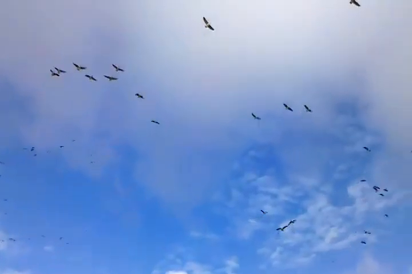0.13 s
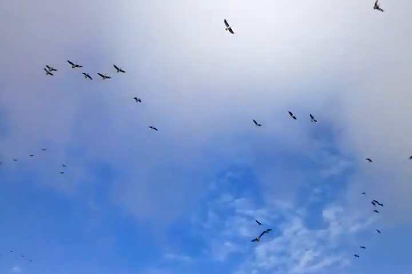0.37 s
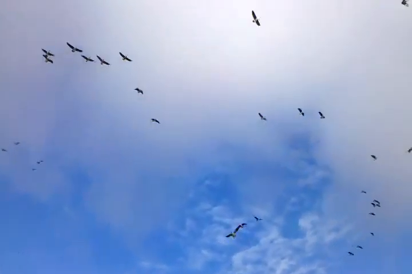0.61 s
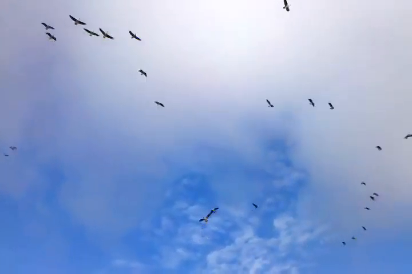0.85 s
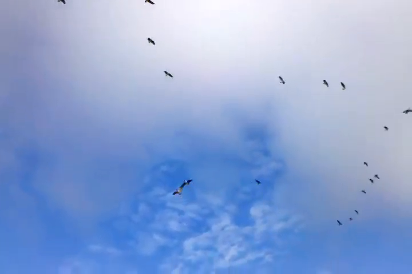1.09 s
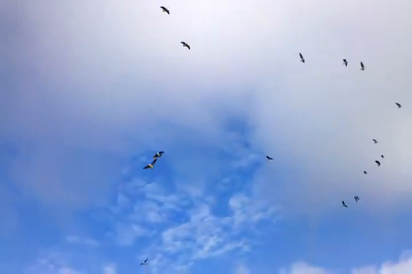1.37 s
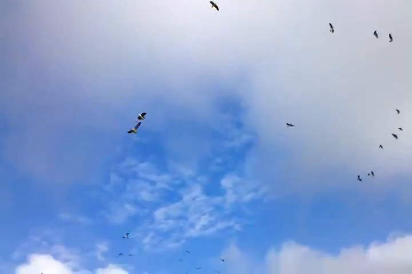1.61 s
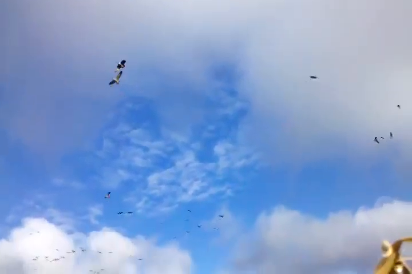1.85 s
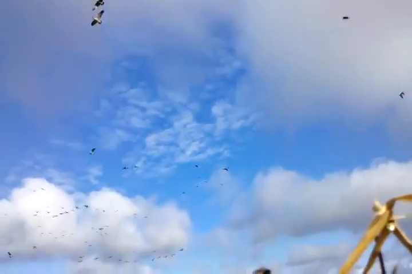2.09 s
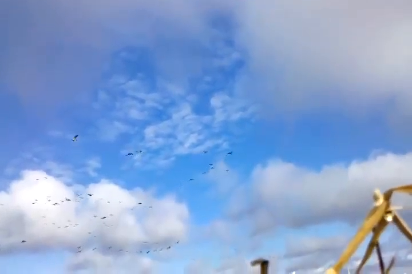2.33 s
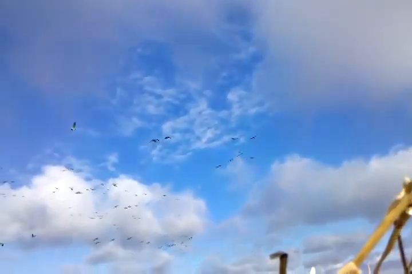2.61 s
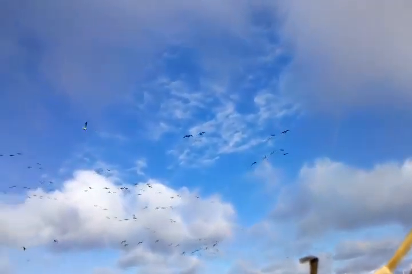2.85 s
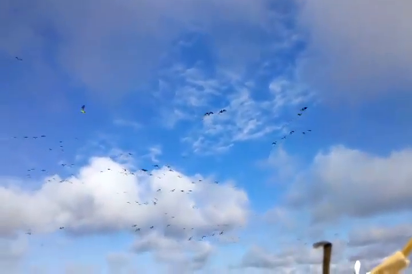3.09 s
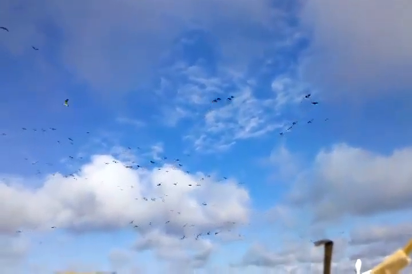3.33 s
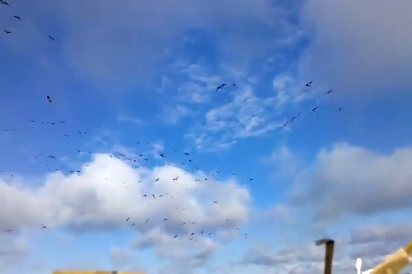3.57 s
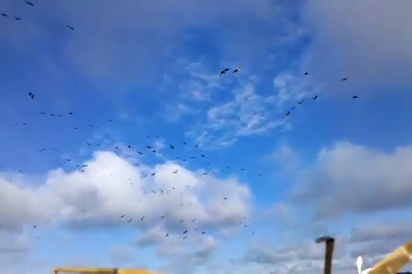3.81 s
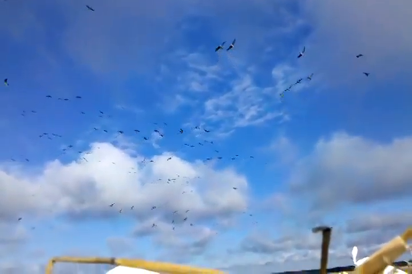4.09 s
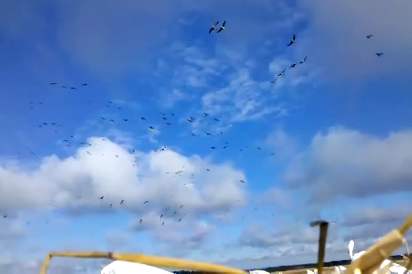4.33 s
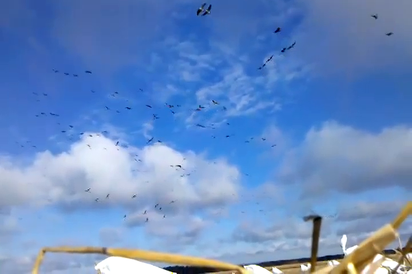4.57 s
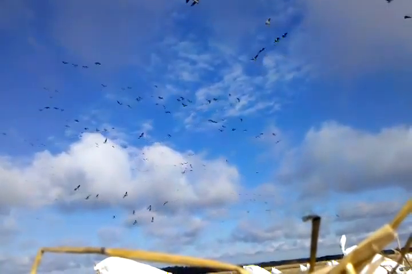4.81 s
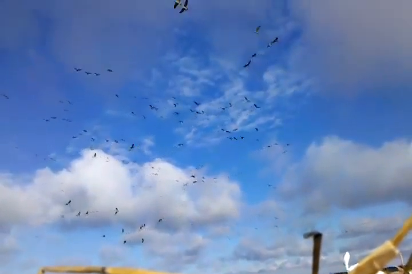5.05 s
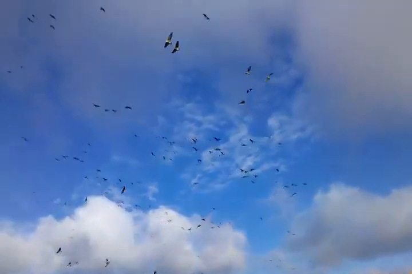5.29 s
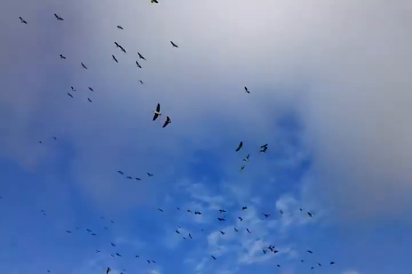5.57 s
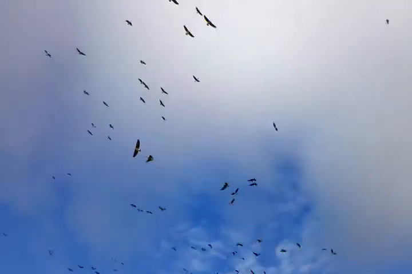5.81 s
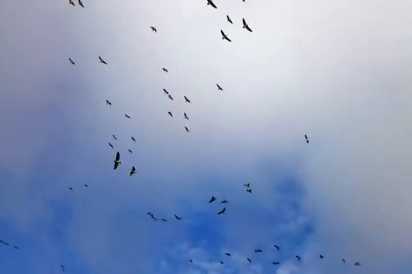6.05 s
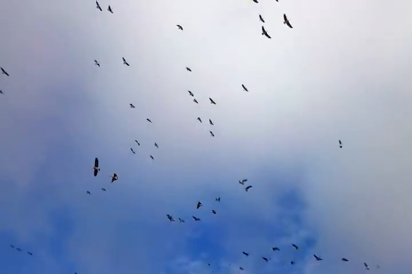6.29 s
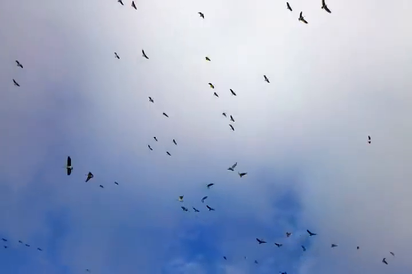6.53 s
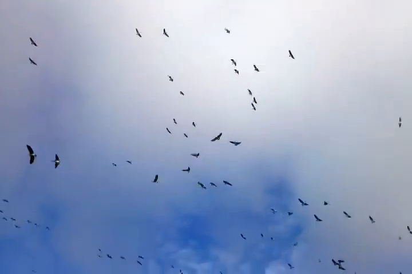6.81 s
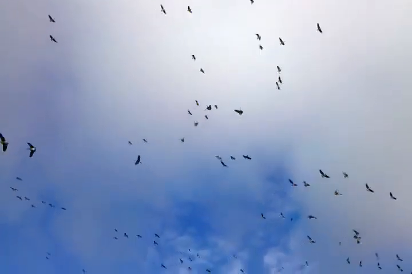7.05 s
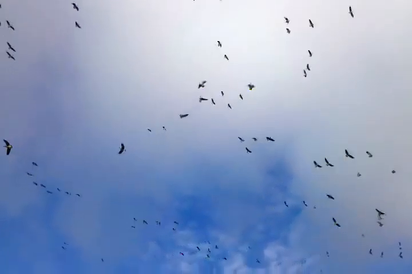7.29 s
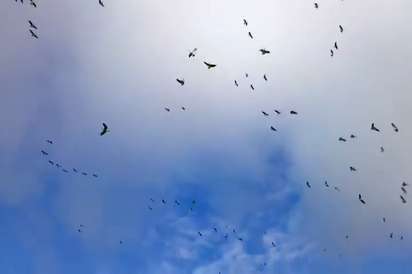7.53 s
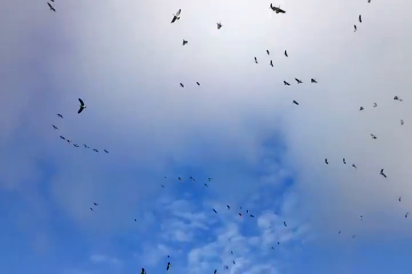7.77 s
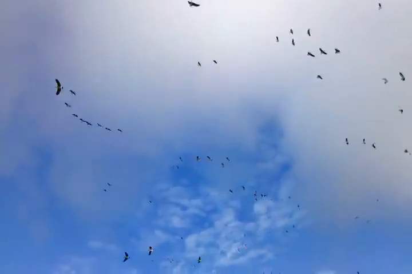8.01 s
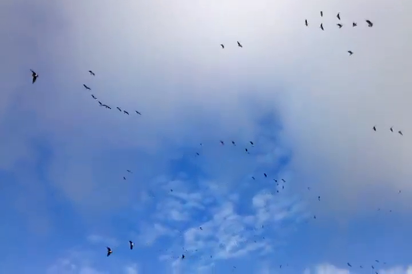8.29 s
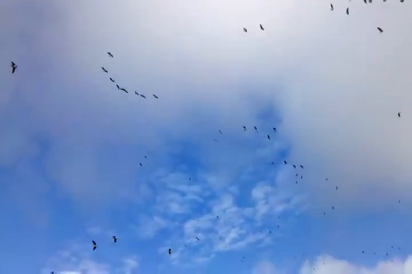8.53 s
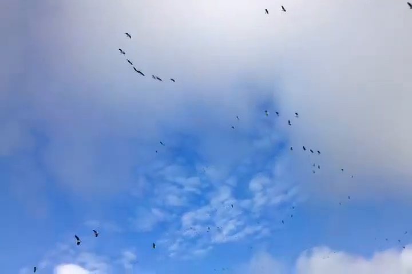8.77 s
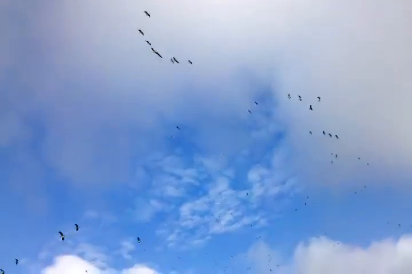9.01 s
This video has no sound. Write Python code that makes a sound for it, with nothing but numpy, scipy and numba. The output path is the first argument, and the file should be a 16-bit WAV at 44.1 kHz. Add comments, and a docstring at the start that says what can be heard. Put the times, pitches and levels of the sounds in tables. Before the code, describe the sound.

A huge flock of geese flies over an open stubble field, calling without pause. Far calls blur into a busy chorus while nearer birds yelp sharply. Four long, deep honks stand out in the first two seconds, hoarse squawks rasp between them, and dry stalks tick close by, most strongly just before three seconds. Light wind thuds softly on a small microphone with thin bass and dulled top treble.

```python
"""A stubble field on a breezy day: a large flock of geese passes over, heard by a small microphone.
Geese: harmonic stacks on an arched, unsteady pitch; near ones have upper partials that follow the bill.
A thousand short far calls, with coloured noise, blur into a chorus; hoarse squawks are noise bursts.
Dry stalks tick close by as very short rings; gusts thud softly on the microphone as low noise."""
import sys
import numpy as np
from scipy import signal
from scipy.fft import rfft, irfft, next_fast_len
from scipy.io import wavfile
from scipy.ndimage import uniform_filter1d
from numba import njit

SR = 44100
rng = np.random.default_rng(int(sys.argv[2]) if len(sys.argv) > 2 else 0)


def ratio(d):
    """dB to gain"""
    e = np.asarray(d, float) / 20
    return 10 ** e


def wav_out(sig):
    """Save sig, one row per channel (or a flat mono array), as 16-bit PCM at SR to the path in sys.argv[1]."""
    wavfile.write(sys.argv[1], SR, np.round(np.clip(np.atleast_2d(sig).T, -1, 1) * 32767).astype(np.int16))


N = 403074
TIME_S = np.arange(N) / SR
SPLIT_HZ, BILL_HZ = 2200, 3600  # bounds of the low, middle and high partials


def shape_db(table, hz):
    """A spectrum table read on a log-frequency axis."""
    table_hz, db = np.transpose(table)
    return np.interp(np.log(np.maximum(hz, 1)), np.log(table_hz), db)


def noise(table, size=N):
    """Noise of rms 1 with the colour of a spectrum table."""
    n = next_fast_len(size)
    colour = ratio(shape_db(table, np.fft.rfftfreq(n, 1 / SR)))
    x = irfft(rfft(rng.standard_normal(n)) * colour, n)[:size]
    return x / x.std()


def walk(rate_hz, size=N):
    """Random levels held 1 / rate_hz and slewed twice; spread near 1."""
    k = int(SR / rate_hz)
    held = np.repeat(rng.standard_normal(size // k + 1), k)
    return 1.478 * uniform_filter1d(uniform_filter1d(held, k), k)[:size]


def follow(table_s, table_db):
    """Level in dB over the scene, straight lines between the points."""
    return np.interp(TIME_S, table_s, table_db)


def add(out, start_s, x):
    """Mixes x in from start_s on."""
    i = int(round(start_s * SR))
    a, b = max(i, 0), max(min(i + len(x), N), 0)
    out[a:b] += x[a - i:max(b, a) - i]


@njit
def stack(phase, gain):
    """Sum of the harmonics of a running phase, each with its complex gain."""
    out = np.zeros(len(phase))
    for i in range(len(phase)):
        z = np.exp(1j * phase[i])
        power = z
        for g in gain:
            out[i] += (g * power).imag
            power *= z
    return out


def membrane(hz, colour, jitter, scatter_db):
    """Phase of an unsteady membrane, hoarse at first; gains and mean frequencies of its harmonics."""
    hoarse_start, settle_s = 0.035, 0.006
    jitter = jitter + hoarse_start * np.exp(-np.arange(len(hz)) / SR / settle_s)
    phase = 2 * np.pi * np.cumsum(hz * (1 + jitter * walk(400, len(hz)))) / SR
    k = np.arange(1, 13)
    at_hz = k * hz.mean()
    gain = ratio(shape_db(colour, at_hz) + scatter_db * rng.standard_normal(len(k)))
    return phase, gain * np.exp(.3j * k ** 2), at_hz


def call(length_s, hz, rise_percent, sag_per_s=21.1, edge_s=0.016, ends_db=3):
    """One call: time, place in it (0-1), pitch arching more in longer calls, level with soft ends."""
    attack_s = 0.008  # the fades are half way at 0 and length_s
    fall_per_s, scoop_per_s = 29, 9  # % of pitch per s of length, like sag_per_s
    t = np.arange(-attack_s, length_s + edge_s, 1 / SR)
    at = t / length_s
    bend = (2 * at - 1) ** 2
    edges = np.minimum((t - t[0]) / attack_s, (t[-1] - t) / edge_s)
    fade = np.sin(np.pi / 2 * np.clip(edges / 2, 0, 1)) ** 2
    # the pitch drops further as the breath runs out
    lowering = sag_per_s * bend + fall_per_s * at ** 8 + scoop_per_s * (1 - at) ** 8
    percent = rise_percent * (at - .5) - length_s * lowering
    return t, at, hz * (1 + percent / 100), fade * ratio(ends_db * bend)


# windpipe and bill: partial_hz, level_db
THROAT = [(600, -0.5), (1300, 21.5), (1900, 2), (2600, 6.5), (3400, -7), (4300, 2.5), (5500, 1.5),
          (6600, 1.5), (7300, -9), (8300, -11)]
# fundamental against second partial: pitch_hz, level_db
FUNDAMENTAL = [(600, -15), (645, -10.5), (700, -28), (780, -5), (850, -3.5), (890, -7.5), (1050, -12)]


def voice(hz, fade, bill, low_db, middle_db, high_db):
    """A throat in three groups of partials; the upper two follow the opening of the bill."""
    phase, gain, at_hz = membrane(hz, THROAT, 0.0022, 1.5)
    gain[0] = abs(gain[1]) * ratio(shape_db(FUNDAMENTAL, hz.mean()))
    gain[2] *= min(1, abs(gain[1] / gain[2]) / 2)  # the third stays under the second
    group = np.digitize(at_hz, (SPLIT_HZ, BILL_HZ))
    for k, db in enumerate((low_db, middle_db, high_db)):
        inside = group == k
        gain[inside] *= ratio(db) / np.sqrt(np.sum(abs(gain[inside]) ** 2) / 2)
    low, middle, high = (stack(phase, gain * (group == k)) for k in range(3))
    flutter = ratio(0.9 * walk(124.3, len(hz)))
    return fade * flutter * (low + np.sqrt(bill) * middle + bill * high)


# wind on the microphone: time_s, level_db
GUSTS = [(0.0, -59.5), (1.35, -60), (1.93, -54.5), (2.04, -45.5), (2.09, -60.5), (2.95, -64.5),
         (3.05, -56.5), (3.44, -64), (4.45, -61), (5.06, -43.5), (5.17, -60.5), (5.37, -38.5),
         (5.47, -61.5), (5.6, -41), (5.8, -53), (7.07, -63), (7.23, -54.5), (7.38, -63.5), (7.64, -51.5),
         (8.02, -61), (9.11, -49), (9.14, -54)]
# gust colour: freq_hz, level_db
GUST_COLOUR = [(30, -11.5), (100, -0.5), (160, -2.5), (230, -4), (350, -13.5), (600, -11.5), (1000, -79.5)]
# low murmur: time_s, level_db
MURMUR = [(0, -55.5), (0.9, -54), (1.1, -59.5), (2.9, -57), (3.1, -54), (3.8, -60), (4.8, -64), (4.95, -64),
          (5.7, -63), (5.8, -63.5), (8.0, -66.5), (8.1, -56), (9.14, -61)]
# murmur colour: freq_hz, level_db
MURMUR_COLOUR = [(100, -40), (200, 2), (330, -7), (480, -3.5), (700, -35)]


def wind():
    """Low turbulence that buffets faster than the gusts change, over a low murmur of varying level."""
    gusts = ratio(follow(*np.transpose(GUSTS)) + 2.2 * walk(20)) * noise(GUST_COLOUR)
    murmur = ratio(follow(*np.transpose(MURMUR))) * noise(MURMUR_COLOUR)
    return gusts + murmur


# far flock, below and above SPLIT_HZ: time_s, low_db, high_db
FLOCK = [(0.0, -36, -38), (0.3, -34.5, -45.5), (0.71, -35, -40), (0.95, -36.5, -45), (1.15, -39.5, -45),
         (1.4, -35, -44.5), (1.95, -39, -43.5), (2.3, -34, -43.5), (2.58, -37, -45), (3.05, -33.5, -41.5),
         (3.42, -39, -55.5), (3.9, -37, -49.5), (5.2, -36.5, -48), (5.75, -39, -51), (6.2, -35.5, -47),
         (6.8, -37, -47), (7.1, -37.5, -51.5), (7.59, -36.5, -44), (8.3, -36.5, -44.5), (9.14, -38, -42.5)]
# far call colour: freq_hz, level_db
FAR_COLOUR = [(300, -34), (450, -17), (600, -9.5), (860, -11), (1050, -7), (1290, -3.5), (1760, -6.5),
              (2250, -19), (3200, -14), (4400, -4), (6500, -6.5), (7400, -20.5)]
# merged upper partials of the furthest birds: freq_hz, level_db
WASH_COLOUR = [(2000, -39.5), (2400, -3), (3300, -4), (4500, -2), (6500, -0.5), (7500, -6)]


def far_geese(count=1000):
    """Far birds call at their own pitch, slur and distance; the furthest merge into a noise wash."""
    lowest_hz, highest_hz, fundamental_db, wash_db = 590, 1015.4, -5.5, -13
    out = np.zeros(N)
    for when, pitch, slur, far, long, facing in rng.random((count, 6)):
        own_hz = lowest_hz + (highest_hz - lowest_hz) * pitch
        rise_percent = 17.76 * (slur - .3)
        _, _, hz, fade = call(.03 + .07 * long, own_hz, rise_percent, sag_per_s=44.6, edge_s=.012)
        phase, gain, at_hz = membrane(hz, FAR_COLOUR, .002, 3.0)
        gain[0] *= ratio(fundamental_db)
        gain[at_hz > SPLIT_HZ] *= ratio(6 * facing ** 3)  # the treble beams ahead of the bill
        add(out, when * N / SR - .05, fade * ratio(-9 * far) * stack(phase, gain))
    # ground and air scatter each honk into a short tail
    tail_n = SR // 4
    tail = rng.standard_normal(tail_n) * np.exp(-np.arange(tail_n) / SR / .05)
    out = out / out.std()
    out = out + ratio(-33) * signal.fftconvolve(out, tail)[:N]
    blur = ratio(-10 + walk(9)) * noise(FAR_COLOUR)
    out = out / out.std() + blur + ratio(wash_db) * noise(WASH_COLOUR)
    # shifting air takes away more or less of the treble
    low, high = (signal.sosfilt(signal.butter(4, SPLIT_HZ, kind, fs=SR, output="sos"), out)
                 for kind in ("low", "high"))
    time_s, low_db, high_db = np.transpose(FLOCK)
    low_gain = ratio(follow(time_s, low_db))
    high_gain = ratio(follow(time_s, high_db) + 0.4 * walk(8.3))
    return low_gain * low / low.std() + high_gain * high / high.std()


# near yelps: start_s, length_s, pitch_hz, rise_percent (start to end),
# low_db (partials to SPLIT_HZ), middle_db (to BILL_HZ), high_db (above)
YELPS = [(0.008,0.08,985,4.5,-38,-46.5,-36.5), (0.258,0.03,820,-3.5,-67,-56,-39),
         (0.362,0.047,906,0,-35.5,-45,-32.5), (0.415,0.04,932,-2,-34,-44,-29),
         (0.516,0.074,819,-0.5,-33.5,-50,-30), (0.631,0.11,987,0,-35,-51,-40),
         (0.953,0.08,975,0,-46,-64,-57), (1.065,0.068,872,5,-43.5,-57,-53),
         (1.139,0.055,964,-0.5,-41,-52,-47), (1.205,0.025,785,7,-36,-51,-35.5),
         (1.672,0.095,950,1.9,-41.5,-39.5,-38), (1.807,0.09,830,-2,-45,-64,-40.5),
         (2.302,0.105,967,3.5,-39,-48,-40.5), (2.478,0.069,938,0,-51,-40.5,-40.5),
         (2.906,0.105,945,-2.5,-35.5,-49,-33.5), (3.093,0.1,850,-1,-31,-38,-34.5),
         (3.211,0.077,940,0.5,-59,-44.5,-40), (3.327,0.035,699,-0.5,-31.5,-44,-43.5),
         (3.387,0.026,880,-3,-50,-58,-55), (3.482,0.044,645,6,-49,-57,-48), (3.632,0.044,680,3,-46,-58,-53),
         (3.706,0.12,892,4,-44.5,-57,-45), (3.851,0.077,1064,0,-48.5,-60,-50.5),
         (3.943,0.11,896,0.5,-50,-53.5,-46.5), (4.135,0.11,707,6.5,-41.5,-61,-55),
         (4.205,0.1,947,1,-47,-52.5,-54.5), (4.353,0.035,642,10,-38.5,-52,-46),
         (4.427,0.053,877,-1,-41,-49,-45), (4.513,0.11,874,-1,-45.5,-56,-68),
         (4.612,0.055,876,1,-48,-54,-46), (4.76,0.072,604,7,-40,-49,-47), (5.002,0.051,719,1.5,-40,-56,-46),
         (5.045,0.095,905,4.5,-47,-54,-41), (5.04,0.07,683,9.5,-49,-54,-54),
         (5.209,0.074,816,1,-49,-53,-42.5), (5.241,0.045,702,2,-49,-51,-41.5),
         (5.305,0.05,851,-2,-47,-51,-48), (5.462,0.052,898,3,-42.5,-48.5,-43.5),
         (5.583,0.096,703,10,-46,-53,-47), (5.727,0.032,1060,-1,-45,-52,-40),
         (5.816,0.1,884,0,-45.5,-50.5,-52), (5.921,0.075,723,3,-42,-54,-47.5),
         (6.025,0.046,923,2,-43,-54,-46.5), (6.135,0.08,907,-4,-42,-48,-41.5),
         (6.223,0.13,902,-1,-41.5,-51.5,-45), (6.4,0.074,834,1.5,-50,-53,-47.5),
         (6.43,0.057,932,2.5,-47,-54,-45.5), (6.533,0.057,690,-2.5,-36,-57,-59),
         (6.698,0.068,835,-3.5,-38.5,-44,-38.5), (6.958,0.048,927,-2.5,-42,-55,-39.5),
         (6.973,0.069,696,2,-47,-52,-44.5), (7.171,0.085,890,1.5,-49,-53,-41),
         (7.272,0.058,756,6,-39.5,-61,-59.5), (7.368,0.075,909,1.5,-41,-48.5,-38.5),
         (7.535,0.036,847,2,-44,-51,-44.5), (7.8,0.046,698,-1,-37.5,-57,-37.5),
         (7.896,0.052,877,3.5,-49,-48,-48), (7.935,0.11,704,5,-47,-57,-44),
         (8.025,0.051,1011,0.5,-42.5,-45.5,-41.5), (8.11,0.06,906,2,-68,-64,-37),
         (8.229,0.084,888,5,-39,-47.5,-46), (8.35,0.053,901,4.5,-39,-45,-35.5),
         (8.535,0.062,892,3,-40,-47,-39), (8.733,0.024,830,-5,-62,-55,-28),
         (8.784,0.035,781,5.5,-38,-64,-45.5), (8.838,0.023,681,3.5,-40,-49,-38),
         (8.878,0.06,670,3,-40,-53,-47), (9.061,0.054,1048,-1.2,-50,-48,-42)]


def near_yelps():
    """Short calls; upper partials swell on their own as the bill opens and turns to the listener."""
    bill_at, bill_width = 0.46, 0.47  # shares of the call
    out = np.zeros(N)
    for start_s, length_s, pitch_hz, rise_percent, *levels_db in YELPS:
        t, at, hz, fade = call(length_s, pitch_hz, rise_percent)
        bill = np.exp(-.5 * ((at - bill_at) / bill_width) ** 2)
        add(out, start_s + t[0], voice(hz, fade, bill, *levels_db))
    return out


# dry stalks: start_s, level_db (before the envelope), ring_hz
TICKS = [(0.283, -27, 5160), (0.581, -23, 6500), (0.635, -21, 6400), (0.9888, -25, 5930),
         (1.092, -27, 6700), (1.186, -21, 6020), (1.375, -15.5, 6660), (2.7148, -17.5, 5800),
         (2.72, -12, 7100), (2.7515, -6, 6370), (2.7668, -14.5, 6860), (2.789, -12, 5800),
         (3.269, -28, 6950), (3.31, -26.5, 6900), (3.467, -22.5, 5950), (3.609, -31, 6500),
         (3.715, -30, 6300), (4.077, -22, 7060), (4.3, -28, 6450), (4.318, -28.5, 6150), (8.347, -12, 6300),
         (8.625, -13.5, 7000)]
# snap of a stalk: freq_hz, level_db
CRACK_COLOUR = [(500, -12.5), (1500, 0.5), (4000, 2), (8000, 2.5)]


def stalks(count=45):
    """Each tick is a very short high ring with a crack; fainter ones come all the time."""
    attack_s, decay_s = 0.0002, 0.00042
    out, t = np.zeros(N), np.arange(SR // 100) / SR
    envelope = (1 - np.exp(-t / attack_s)) ** 2 * 2 * np.exp(-t / decay_s)
    faint = [(when * N / SR, -37 + 10 * size, 5400 + 1500 * pitch)
             for when, size, pitch in rng.random((count, 3))]
    for start_s, level_db, ring_hz in TICKS + faint:
        tick = np.sin(2 * np.pi * ring_hz * t) + 0.55 * noise(CRACK_COLOUR, len(t))
        add(out, start_s, ratio(level_db) * tick * envelope)
    return out


# hoarse squawks: centre_s, level_db, half_length_s
RASPS = [(0.339, -35, 0.03), (0.402, -30, 0.025), (0.63, -37, 0.025), (0.886, -34, 0.03),
         (1.235, -41, 0.025), (1.406, -37, 0.03), (2.05, -38, 0.025), (2.115, -38, 0.03),
         (2.292, -33, 0.03), (2.897, -33, 0.025), (3.09, -34, 0.03), (3.335, -41, 0.02),
         (3.375, -40, 0.025), (5.727, -44, 0.012), (6.36, -42, 0.02), (4.432, -40, 0.04),
         (4.812, -41, 0.04), (4.884, -37, 0.018), (4.922, -39, 0.02), (6.9, -42, 0.04), (7.53, -41, 0.04),
         (7.79, -39, 0.04), (8.715, -34, 0.035)]
# squawk colour: freq_hz, level_db
RASP_COLOUR = [(500, -23.5), (1500, -6), (3000, -9), (4200, 6), (8000, -5.5)]


def rasps():
    """Air forced through a membrane that flaps without pitch: bright noise of rough level."""
    out = np.zeros(N)
    for centre_s, level_db, half_length_s in RASPS:
        n = int(2 * max(half_length_s, .01) * SR)
        rough = ratio(level_db + 2 * walk(500, n))
        add(out, centre_s - half_length_s, rough * np.hanning(n) * noise(RASP_COLOUR, n))
    return out


# long deep honks: start_s, length_s, pitch_hz, rise_percent (start to end),
# low_db, middle_db, high_db (groups as in the yelps), widest_s (bill, after the start)
HONKS = [(0.375, 0.17, 644, 10.3, -29, -47, -25, 0.099), (0.721, 0.16, 590, 14, -32, -35.5, -34, 0.075),
         (1.23, 0.18, 646.4, 9.4, -27, -40, -25, 0.087), (2.072, 0.18, 648, 3.3, -29.5, -40, -24, 0.091)]


def near_honks():
    """Long calls that swell in the middle; the bill snaps open and closes slower."""
    open_s, close_s, shut_db = 0.014, 0.025, -14
    out = np.zeros(N)
    for start_s, length_s, pitch_hz, rise_percent, *levels_db, widest_s in HONKS:
        t, _, hz, fade = call(length_s, pitch_hz, rise_percent, sag_per_s=10.26, ends_db=-7)
        pace_s = np.where(t < widest_s, open_s, close_s)
        bill = ratio(shut_db) + np.exp(-((t - widest_s) / pace_s) ** 2)
        add(out, start_s + t[0], voice(hz, fade, bill, *levels_db))
    return out


# middle-distance calls: start_s, length_s, pitch_hz, rise_percent (start to end), low_db
MIDDLE = [(0.387, 0.015, 803, 3.5, -27.5), (0.579, 0.045, 958, 6.5, -39), (0.839, 0.04, 708, -2.5, -36.5),
          (0.941, 0.04, 836, -0.5, -43), (1.433, 0.03, 902, -2, -49), (1.513, 0.084, 666, 1, -44),
          (1.569, 0.049, 853, -2.5, -41.5), (1.703, 0.08, 574, 14.5, -41), (1.749, 0.13, 1020, 0, -48.5),
          (1.931, 0.076, 654, 0, -43.5), (1.952, 0.076, 697, 3.5, -42.5), (2.009, 0.097, 871.0, 4, -41),
          (2.105, 0.085, 818.0, 6, -42.5), (2.283, 0.046, 811, 5, -40), (2.338, 0.051, 872, 2.9, -45),
          (2.36, 0.052, 764, 1, -51), (2.619, 0.17, 863, 2.5, -46.5), (2.741, 0.048, 636, 1, -38.5),
          (2.784, 0.13, 886, 0.7, -42.5), (2.809, 0.04, 607, 6.5, -38), (2.97, 0.085, 634, 1, -50),
          (3.055, 0.044, 615, -3, -33.5), (3.196, 0.072, 724.0, -2.5, -44.5),
          (3.304, 0.075, 853, -1.5, -41), (4.158, 0.035, 885, 0, -40.5), (4.268, 0.027, 850, 2, -44),
          (4.355, 0.1, 865, -5.5, -48), (4.587, 0.068, 717, 6, -42.5), (4.612, 0.059, 636, 3, -40.5),
          (4.642, 0.098, 1023, -6, -48), (4.707, 0.057, 850, -6, -51), (4.767, 0.16, 873, -1.2, -42),
          (4.831, 0.036, 961, 7.5, -42.5), (4.882, 0.056, 920, 0.5, -42), (4.982, 0.069, 614.0, 4.5, -48),
          (5.212, 0.063, 708, -1.5, -42), (5.422, 0.076, 815, 0.5, -47), (5.596, 0.072, 970, 3.5, -53),
          (6.035, 0.036, 647, 8.5, -39.5), (6.043, 0.11, 696, -3.5, -42), (6.152, 0.021, 937, 2.5, -43.5),
          (6.464, 0.19, 697, 12, -45.5), (6.469, 0.051, 773, 12, -44), (6.862, 0.11, 598.4, 14, -42.5),
          (6.956, 0.067, 920, -10, -48), (7.151, 0.064, 630, 2.5, -45), (7.38, 0.032, 983, 4, -43),
          (7.536, 0.049, 886.0, -5, -40), (7.55, 0.154, 640, 2.5, -46), (7.734, 0.1, 766, 10, -45.5),
          (7.87, 0.12, 1023.0, 12.5, -51), (8.003, 0.049, 915, 2, -42), (8.02, 0.067, 870, 9.5, -49),
          (8.137, 0.097, 882, -1, -43), (8.2, 0.035, 748, 8, -36.5), (8.294, 0.114, 840, 8, -41.5),
          (8.606, 0.045, 910, 5, -47), (8.712, 0.048, 627, 0, -41.5), (9.018, 0.072, 707, 0, -41.5),
          (9.033, 0.1, 630, 6.5, -50)]


def middle_geese():
    """The yelps from further off, where little but the lowest partials stands out."""
    out = np.zeros(N)
    for start_s, length_s, pitch_hz, rise_percent, low_db in MIDDLE:
        t, _, hz, fade = call(length_s, pitch_hz, rise_percent)
        add(out, start_s + t[0], voice(hz, fade, 1, low_db, low_db - 17, low_db - 15))
    return out


def scene():
    """All layers summed to one channel."""
    geese = far_geese() + near_yelps() + rasps() + near_honks() + middle_geese()
    return (wind() + geese + stalks())[None]


def top_cut(x):
    """Nothing passes above the cut-off."""
    return signal.sosfilt(signal.butter(12, 8320, fs=SR, output="sos"), x)


# microphone response: freq_hz, level_db
MIC = [(30, -35.5), (70, -10.5), (150, 2), (6800, -0.5), (7300, -7.5), (7800, -21.5), (8300, -39.5),
       (9000, -67.5)]


def record(dry):
    """The small microphone loses the deep bass and everything above about 7 kHz."""
    n = next_fast_len(N)
    response = ratio(shape_db(MIC, np.fft.rfftfreq(n, 1 / SR)))
    heard = irfft(rfft(dry, n) * response, n)[:, :N]
    return top_cut(heard)


dry = scene()
out = record(dry)
wav_out(out)
```